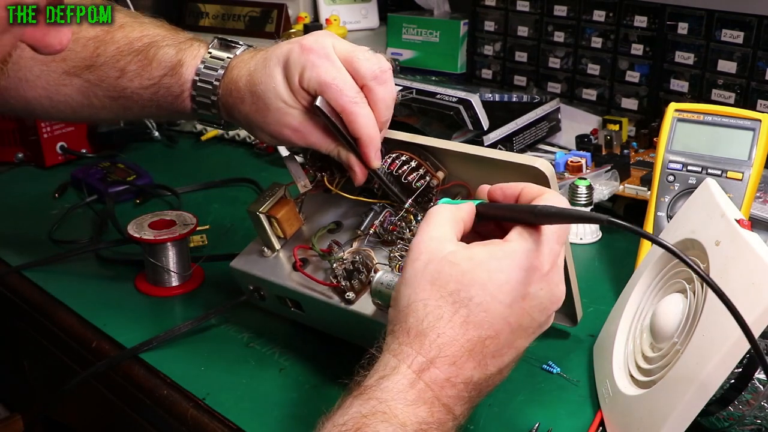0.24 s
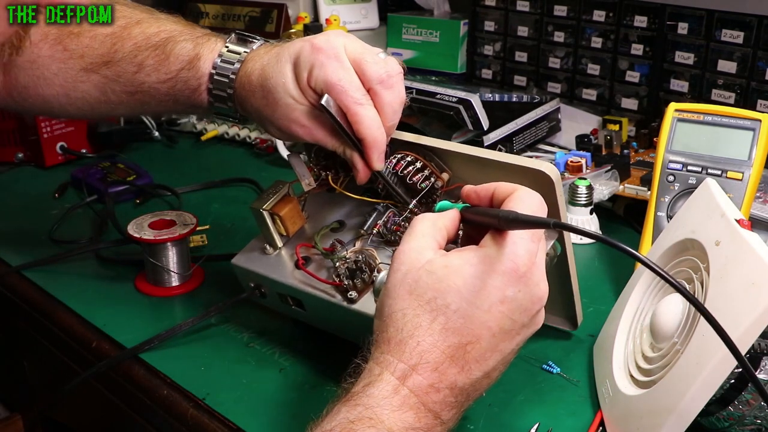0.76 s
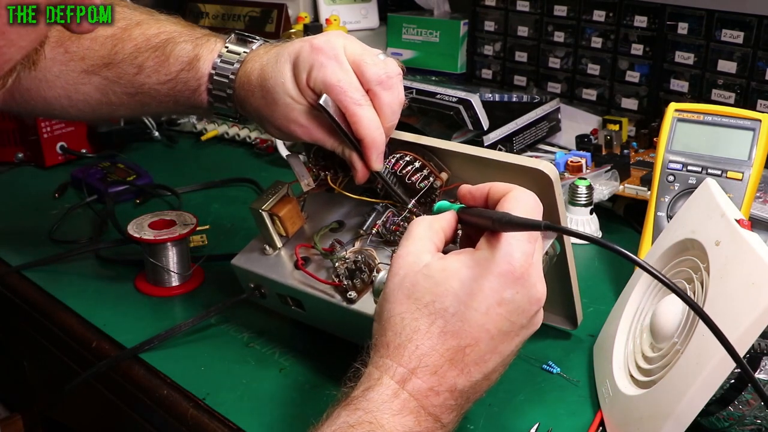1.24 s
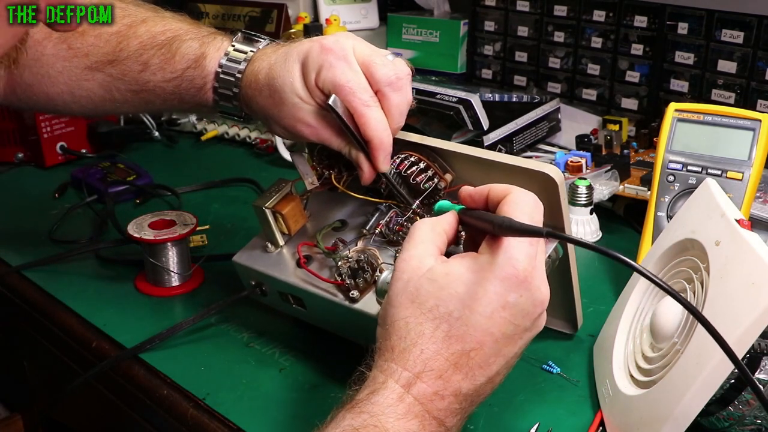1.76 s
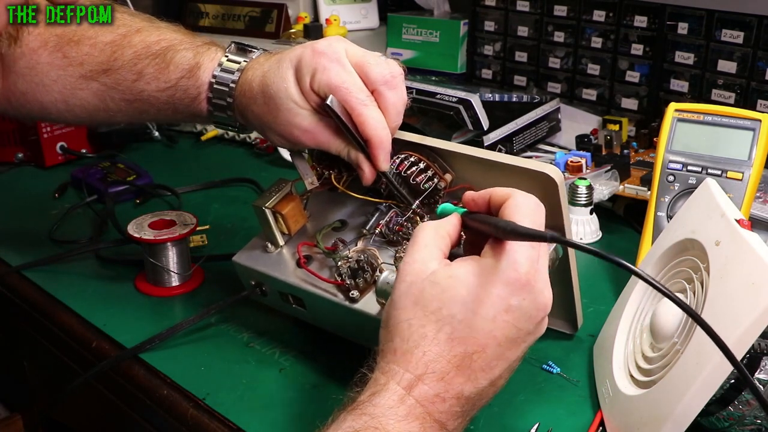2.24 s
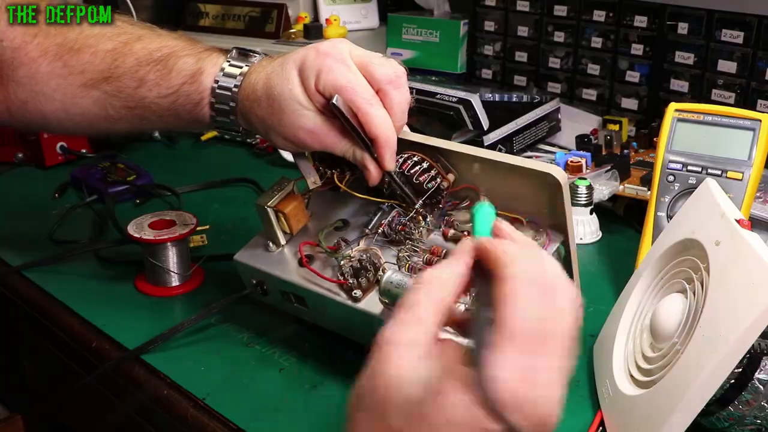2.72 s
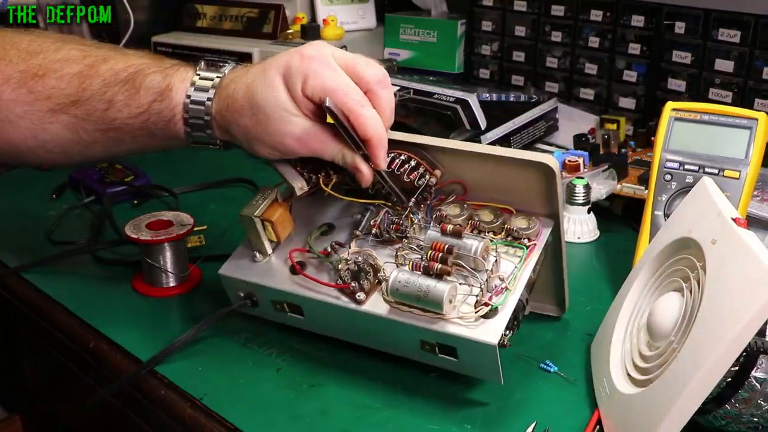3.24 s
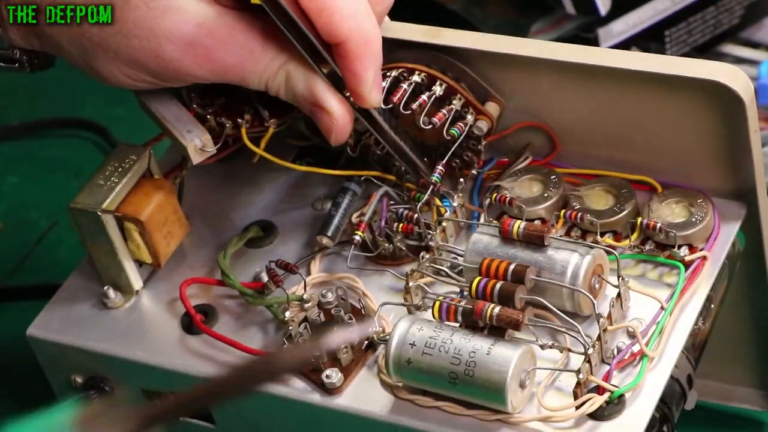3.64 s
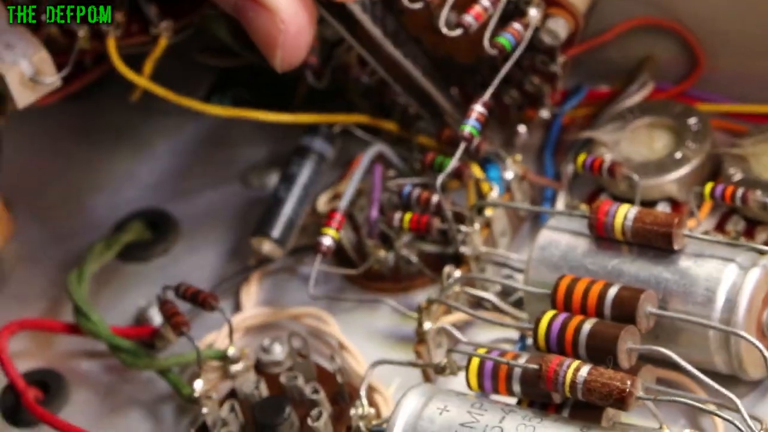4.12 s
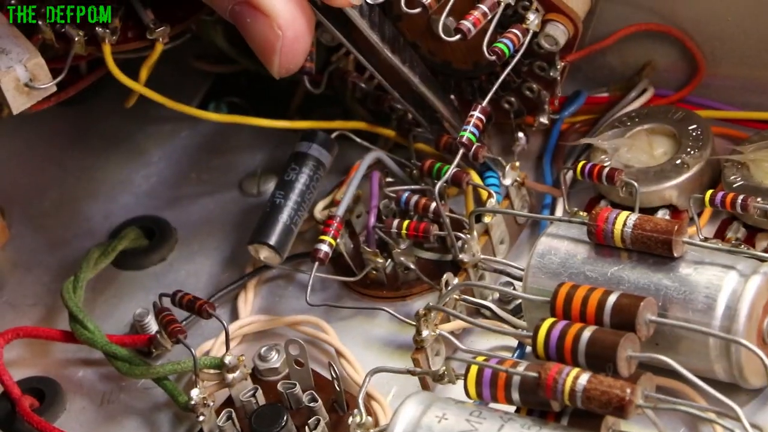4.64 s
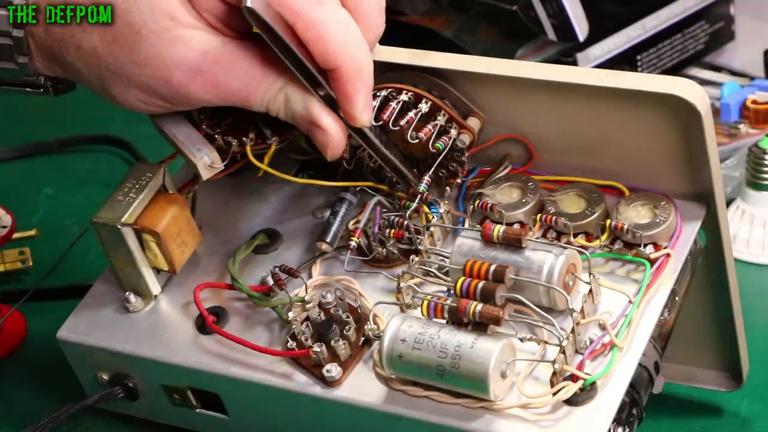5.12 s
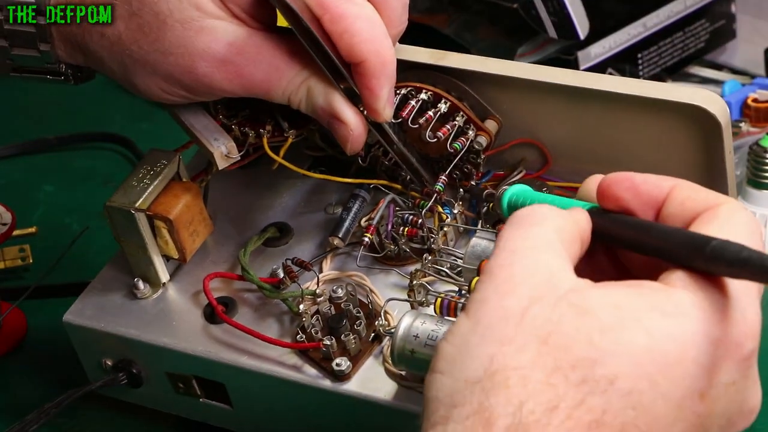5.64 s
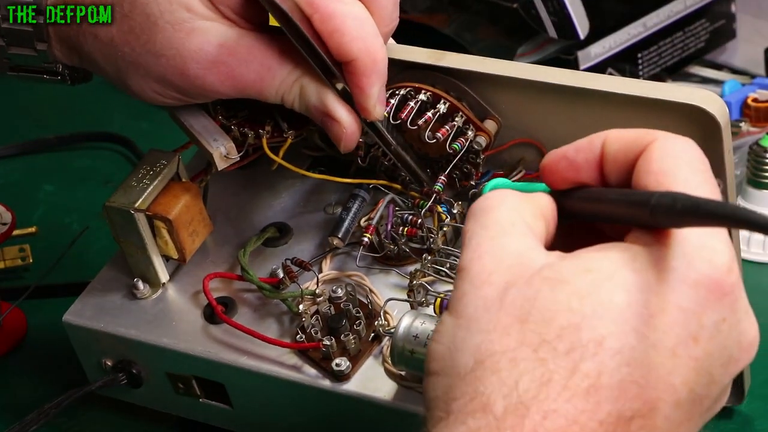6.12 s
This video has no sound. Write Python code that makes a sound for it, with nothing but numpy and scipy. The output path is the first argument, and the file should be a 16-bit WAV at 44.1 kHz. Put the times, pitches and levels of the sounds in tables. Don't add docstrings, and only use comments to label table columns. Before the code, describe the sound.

Close stereo camera pickup at an indoor workbench: continuous fan air and faint whining motor tones. Tiny metal contacts and a quick tweezer click precede a soft body bump. A loud dry button click begins about two seconds of thin, high mechanical whirr and skin rustle near the left side. A latch rattles briefly, later a hard switch snap lands among light ticks and low handling thumps. The whirr cuts off, leaving the fan.

```python
import sys
import numpy as np
from scipy import signal
from scipy.fft import rfft, irfft, next_fast_len
from scipy.io import wavfile
from scipy.ndimage import uniform_filter1d, map_coordinates

SR = 44100
rng = np.random.default_rng(int(sys.argv[2]) if len(sys.argv) > 2 else 0)


def output_pcm(signal):
    pcm = np.clip(np.atleast_2d(signal).T, -1, 1) * 32767
    wavfile.write(sys.argv[1], SR, np.round(pcm).astype(np.int16))


def nominal_scale(level):
    x = np.asarray(level, float) / 20
    return 10 ** x


N = 280917

# (f/Hz, level/dB, t60/s)
TWEEZERS = [(5800, 0, .004), (7000, -6, .004), (5200, -7, .005)]
BUTTON = [(4600, 0, .0011), (5300, -13, .004), (4800, -22, .007), (10300, -19, .005), (970, -33, .03)]
LATCH = [(3850, 0, .0045), (3420, -14, .012), (4550, -14, .006)]


def unit(x):
    return x / np.sqrt(np.mean(x ** 2) + 1e-20)


def along(points, hz):
    f, v = np.transpose(points)
    return np.interp(np.log(hz + 1), np.log(f + 1), v)


def wobble(rate):
    knots = rng.standard_normal(int(N * rate / SR) + 4)
    return map_coordinates(knots, [np.arange(N) * rate / SR])


def filtered(x, response):
    m = next_fast_len(N + 8192)
    return irfft(rfft(x, m) * response(np.fft.rfftfreq(m, 1 / SR)), m)[..., :N]


def bell(hz, centre, width):
    return 1 / (1 + (2 * (hz - centre) / width) ** 2)


def resonances(table, hz):
    return nominal_scale(sum(db * bell(hz, centre, width) for centre, width, db in table))


def rush(gain, alike, patchy_db):
    z = signal.stft(rng.standard_normal((2, N)), nperseg=512)[2]
    field = uniform_filter1d(rng.standard_normal(z.shape[1:]), size=6, axis=0)
    field = uniform_filter1d(field, size=8, axis=1)
    pair = signal.istft(z * nominal_scale(patchy_db * unit(field)), nperseg=512)[1][:, :N]

    def mid_side(hz):
        turn = np.arccos(np.clip(alike(hz), -1, 1)) / 2
        return gain(hz) * [np.cos(turn), np.sin(turn)]

    mid, side = filtered(pair, mid_side)
    return unit(np.array([mid + side, mid - side]))


def ring(hz, t60, attack):
    t = np.arange(SR // 5) / SR
    return nominal_scale(-60 * t / t60) * (1 - np.exp(-t / attack)) * np.sin(2 * np.pi * hz * t)


def tick(hz, t60, crack_db):
    t = np.arange(SR // 5) / SR
    crack_db = crack_db + 6 * min(np.log2(hz / 10000), 0)
    crack = nominal_scale(crack_db - 60 * t / t60) * np.diff(rng.standard_normal((2, len(t) + 1))) / 2
    return crack - 1.4 * ring(hz, t60, attack=.4 / hz)


def add(track, s, sound, pan_db, lead_ms=0):
    both = sound * nominal_scale([[pan_db / 2], [-pan_db / 2]])
    for port, start in enumerate([s, s + lead_ms / 1000]):
        track[port, round(start * SR):][:both.shape[-1]] += both[port]


def drone():
    # (start t/s, length/s, f/Hz, level/dB rms)
    swells = [
        (0.7, .5, 287, -66),
        (4.15, .4, 245, -70),
    ]
    track = np.zeros((2, N + SR))
    for s, length, hz, db in swells:
        t = np.arange(int(length * SR)) / SR
        swell = np.sin(np.pi * t / length)
        add(track, s, nominal_scale(db + 5.0) * swell * np.sin(2 * np.pi * hz * t), pan_db=-.3)
    return track[:, :N] * nominal_scale(2.1 * wobble(11))


def fan_air():
    # (f/Hz, level/dB per Hz)
    rush_spectrum = [(15, -65), (25, -31), (226, -22), (291, -15), (334, -18), (592, -12), (664, -15),
                     (711, -9.5), (798, -15), (1050, -0.5), (1120, -3.5), (1820, -7.5), (2570, -2),
                     (4350, -8.5), (6000, -12), (7800, -45), (13200, -120)]
    hiss_spectrum = [(2000, -34), (3200, -4), (4100, -7.5), (4500, -13.5), (6500, -8.5), (9000, -9.5),
                     (10700, -9), (11400, -11), (13000, -10.5), (13700, -12), (14200, -14), (15700, -19.5)]
    # (f/Hz, width/Hz, lift/dB)
    housing = [(253, 10, 4), (263, 10, 3.5), (296, 11, 5), (2643, 61, -5), (1490, 48, -4.5), (524, 49, 6.5),
               (720, 40, -2), (924, 97, 6.5), (1032, 72, 3), (1052, 14, 6), (1612, 200, 8), (2440, 124, 3),
               (2603, 63, 11), (2786, 153, 5.5), (3060, 196, 4)]
    # (f/Hz, width/Hz, lift/dB)
    grille = [(3950, 250, 4), (4300, 200, -2), (4600, 250, 1.5), (5050, 150, 2), (5340, 200, 5),
              (5650, 150, -2.5), (3300, 120, 2), (7650, 150, -2), (2594, 18, 3.5), (5800, 150, 2),
              (6300, 130, 2), (7420, 250, 3), (11000, 350, 2.5), (12430, 450, 3), (14700, 300, 1.5)]
    # (f/Hz, left-right likeness)
    likeness = [(60, .25), (200, .2), (300, .68), (480, .8), (800, .78), (1150, .96), (2740, 0.69),
                (15000, .36)]

    def alike(hz):
        return 1 - (1 - along(likeness, hz)) / resonances(housing, hz) ** 2

    def rush_gain(hz):
        return nominal_scale(along(rush_spectrum, hz)) * resonances(housing + grille, hz)

    def hiss_gain(hz):
        low_cut = 1 + (4500 / (hz + 1)) ** 4
        return nominal_scale(along(hiss_spectrum, hz)) * resonances(housing + grille, hz) / low_cut

    body = rush(rush_gain, alike, patchy_db=0.28)
    hiss = rush(hiss_gain, alike, patchy_db=0.7)
    body_db, hiss_db = -39.5, -41.5
    return nominal_scale(body_db + 0.25 * wobble(8)) * body + nominal_scale(hiss_db + 0.31 * wobble(12)) * hiss


def motor_hum():
    tone_hz = [307, 600, 708, 722, 749, 1200, 1410, 1800, 1826, 1911, 2874, 3000, 3134, 3473, 4749]
    tone_db = [-71.5, -60, -68.5, -70.5, -65.5, -61.5, -65, -68.5, -71, -62.5, -56.5, -60, -64, -59, -66]
    cycle = 2 * np.pi * np.arange(N) / SR
    hum = np.zeros(N)
    for hz, db in zip(tone_hz, tone_db):
        level = nominal_scale(db + 3 + .8 * wobble(3))
        hum += level * np.sin(hz * cycle + .6 * wobble(3))
    return hum


def fan():
    # (f/Hz, left minus right level/dB)
    lean = [(60, -0.5), (110, -2), (200, 1), (380, -1.5), (700, -.5), (1290, -0.3), (2380, 0.0),
            (4400, 0.0), (8120, -1.5), (15000, -5.5)]
    # (f/Hz, phase/rad)
    left_leads = [(1700, 0), (3000, -0.4), (7400, -1), (10500, -1.5), (12500, -2), (15500, -1.5)]
    side = np.array([[.5], [-.5]])
    return filtered(fan_air() + motor_hum(),
                    lambda hz: nominal_scale(along(lean, hz) * side) * np.exp(1j * along(left_leads, hz) * side))


def nudges():
    # (t/s, peak level/dB, f/Hz, t60/s)
    pushes = [(2.9, -39, 563, .03), (2.903, -40, 800, .025), (3.44, -59, 120, 0.074),
              (3.855, -47, 111, 0.027), (3.858, -35.5, 322, .018), (4.8, -61, 101, .1),
              (4.922, -54, 130, .04), (4.974, -54, 55, .05), (5.03, -52, 150, .05), (5.088, -58, 165, .05),
              (5.125, -52, 120, .04), (5.154, -47, 140, .04), (5.205, -51, 200, 0.033),
              (5.208, -46, 310, .03), (6.35, -55, 120, 0.046)]
    track = np.zeros((2, N + SR))
    for s, db, hz, t60 in pushes:
        add(track, s, nominal_scale(db + 2) * ring(hz, t60, attack=0.0018), pan_db=rng.normal(0, 7))
    return track[:, :N]


def small_ticks(track):
    # (t/s, peak level/dB, ring f/Hz, t60/s, left minus right level/dB)
    touches = [(0.235, -27, 8150, .006, 0), (0.559, -33, 13300, .008, -4), (2.415, -36, 14500, .008, -2),
               (2.9057, -31, 13000, .007, -1), (3.207, -34, 14800, .006, 3), (3.259, -34, 10800, 0.0072, 0),
               (3.3424, -20, 2000, .0025, -2), (4.227, -38, 12000, .015, 1), (4.9722, -23, 11300, .003, 3),
               (5.009, -34, 10500, .004, 5), (5.091, -37, 11000, .005, 5), (5.128, -36, 10100, .008, 2),
               (5.207, -25, 10500, 0.0033, 2), (5.281, -36, 12000, .004, -3),
               (5.2875, -33, 11000, .012, -3), (5.297, -34, 12000, .004, -3)]
    for s, db, hz, t60, pan_db in touches:
        add(track, s, nominal_scale(db) * tick(hz, t60, crack_db=7), pan_db)


def firm_clicks(track):
    # (part, t/s, peak level/dB, left minus right level/dB, left lead/ms)
    strikes = [
        (TWEEZERS, 2.4202, -25, 1, 0),
        (TWEEZERS, 2.4211, -30, 1, 0),
        (BUTTON, 3.33956, -4, -4, .07),
        (LATCH, 3.85793, -16, 1, 0),
        (LATCH, 3.8598, -25, 0, 0),
        (LATCH, 3.8607, -21, 0, 0),
        (LATCH, 3.8618, -27, 0, 0),
    ]
    for part, s, db, pan_db, lead_ms in strikes:
        click = sum(nominal_scale(level) * tick(hz, t60, crack_db=-7) for hz, level, t60 in part)
        add(track, s, nominal_scale(db) * click, pan_db, lead_ms)


def switch_snap(track):
    # (f/Hz, peak level/dB, t60/s, first swing outward 1 or inward -1)
    partials = [(940, -2, .0045, -1), (1680, -14, .006, 1), (2250, -16, .004, 1), (3330, -14, .0065, -1),
                (3930, -10, .005, -1), (4620, -15, .01, -1), (5350, -16.5, .005, 1), (9200, -19, .004, -1),
                (10300, -11, .004, -1), (11600, -25, .005, -1), (14700, -34, .008, -1)]
    # (delay t/s, level/dB)
    bounces = [(.0015, -13)]
    t = np.arange(SR // 5) / SR
    snap = sum(swing * nominal_scale(db) * ring(hz, t60, attack=.25 / hz) for hz, db, t60, swing in partials)
    snap = snap + nominal_scale(-19 - 60 * t / .007) * rng.standard_normal((2, len(t)))
    for delay, db in [(0, 0)] + bounces:
        add(track, 4.9802 + delay, nominal_scale(db) * snap, pan_db=-1, lead_ms=.03)


def contacts():
    track = np.zeros((2, N + SR))
    small_ticks(track)
    firm_clicks(track)
    switch_snap(track)
    low_cut = signal.butter(3, 450, "high", fs=SR, output="sos")
    return signal.sosfilt(low_cut, track[:, :N])


def room(x):
    t = np.arange(SR // 4) / SR
    tail = rng.standard_normal((2, len(t))) * nominal_scale(-60 * t / 0.095)
    return signal.fftconvolve(x, tail / np.linalg.norm(tail[0]), axes=1)[:, :N]


def whirr_level():
    on_s, off_s = 3.33, 5.3
    grows, spin_up, run_down = 1.04, 42, 150
    t = np.arange(N) / SR
    early, late = np.maximum(on_s - t, 0), np.maximum(t - off_s, 0)
    return -47 + grows * (t - on_s) - spin_up * early - run_down * late


def grip_rustle(whirr_db):
    # (t/s, level/dB)
    shifts = [(2.9, -48), (3.24, -46.5), (3.63, -51), (3.86, -44.5), (4.23, -48), (4.95, -49), (5.08, -45),
              (5.16, -45), (5.28, -50)]
    # (f/Hz, level/dB per Hz)
    skin = [(2000, -19), (5000, -19), (9000, -3), (12000, -1.5), (15000, -7), (16500, -30)]
    t = np.arange(N) / SR
    resting_db = whirr_db - 10
    shift_db = [db - 68 * abs(t - s) for s, db in shifts]
    rustle_db = np.max([resting_db] + shift_db, axis=0)
    slips = unit(nominal_scale(2.2 * wobble(60)))
    friction = rush(lambda hz: nominal_scale(along(skin, hz)), lambda hz: 0.11 + 0 * hz, patchy_db=2.5)
    return nominal_scale(rustle_db) * slips * friction * nominal_scale([[2.2], [-1.2]])


def lens_drive(whirr_db):
    barrel_hz = [5790, 6000, 6270, 6900, 7460, 8000, 8400, 10000]
    # (width/Hz, level/dB)
    barrel_shapes = [(120, -12), (120, -4.5), (130, -9.5), (200, -2.5), (231.48, -4), (130, -5),
                     (200, -2.5), (700, -10)]
    # (f/Hz, left-right likeness)
    likeness = [(6000, 1), (7600, 0.8), (8300, -0.65), (10000, -0.3)]

    def barrel(hz):
        power = sum(nominal_scale(2 * db) * bell(hz, c, width) for c, (width, db) in zip(barrel_hz, barrel_shapes))
        return np.sqrt(power)

    whirr = rush(barrel, lambda hz: along(likeness, hz), patchy_db=1) * nominal_scale([[2.5], [-1.5]])
    return nominal_scale(whirr_db + 0.48 * wobble(5.5)) * whirr


def scene():
    hits = contacts()
    whirr_db = whirr_level()
    camera = nudges() + grip_rustle(whirr_db) + lens_drive(whirr_db)
    return drone() + fan() + camera + hits + nominal_scale(-18.5) * room(hits)


def top_cut(x):
    return signal.sosfilt(signal.butter(12, 17020, fs=SR, output="sos"), x)


def record(dry):
    mix = filtered(dry, lambda hz: hz < 15740)
    return top_cut(mix)


dry = scene()
out = record(dry)
output_pcm(out)
```